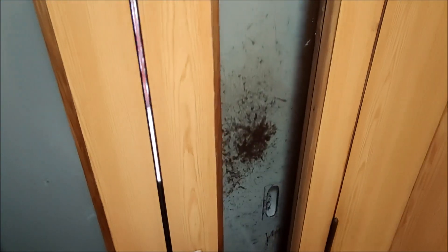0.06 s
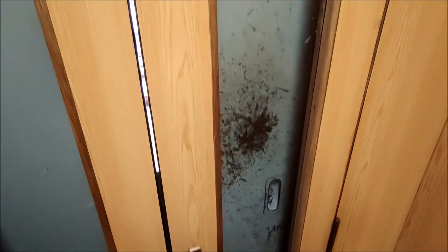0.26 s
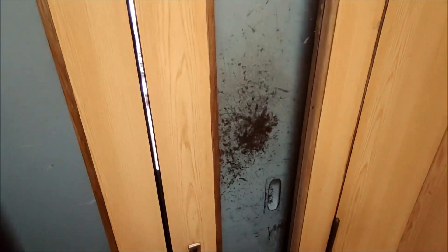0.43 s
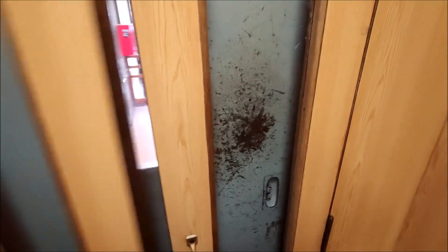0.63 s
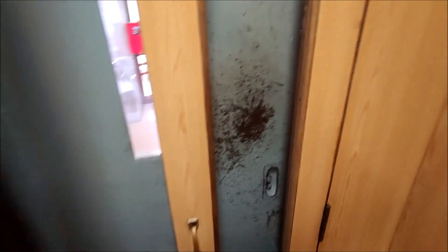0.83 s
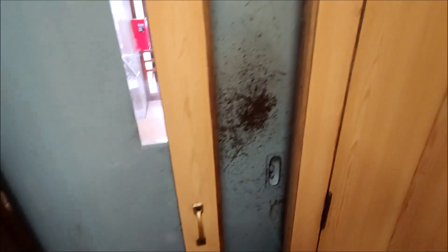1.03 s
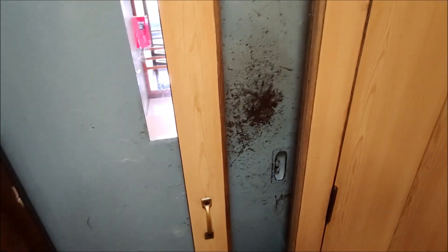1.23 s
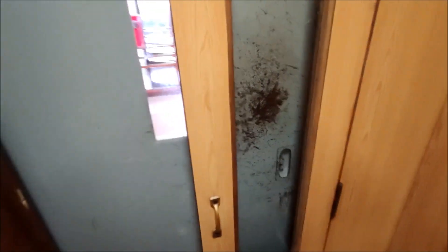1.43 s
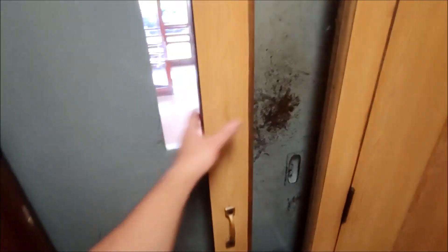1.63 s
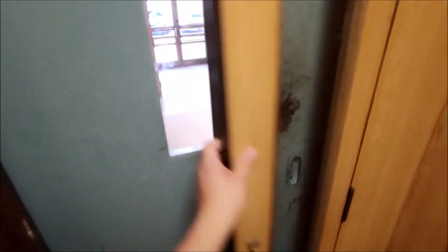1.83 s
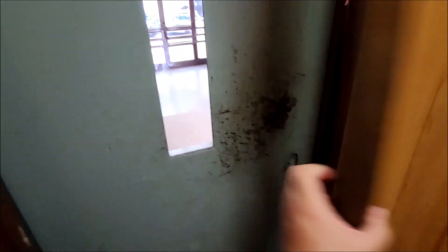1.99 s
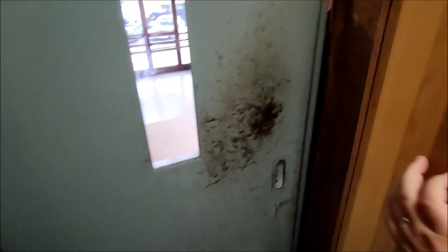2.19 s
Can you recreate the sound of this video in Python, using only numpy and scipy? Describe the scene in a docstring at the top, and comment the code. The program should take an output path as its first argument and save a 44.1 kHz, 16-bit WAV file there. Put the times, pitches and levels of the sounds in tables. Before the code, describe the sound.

Wooden folding doors are pushed open, thumping, scraping along their track and clacking against their stops with a faint squeak and metal jingle. A second door then folds back with another clack, heard close inside a small lift.

```python
"""A soft knock and a brief rub, then wooden folding doors thump free inside a small, hard-walled lift cabin.
Pushed open, the leaves scrape along their track and clack against their stops; dry pivots squeak and a
metal fitting jingles. A hand then folds back the second door. Knocks and scrapes ring the panels and the
boomy cabin over the faint air of the shaft, heard from close by through two unlike microphone ports."""
import sys
import numpy as np
from scipy import signal
from scipy.fft import rfft, irfft
from scipy.io import wavfile
from scipy.ndimage import uniform_filter1d

SR = 44100
rng = np.random.default_rng(int(sys.argv[2]) if len(sys.argv) > 2 else 0)


def inscribe(sig):
    """Save sig as 16-bit PCM at rate SR to the path in sys.argv[1].

    A 1-D sig is mono; a 2-D sig holds one channel per row.
    Samples are clipped to [-1, 1] before scaling.
    """
    pcm = np.round(np.clip(np.atleast_2d(sig).T, -1, 1) * 32767)
    wavfile.write(sys.argv[1], SR, pcm.astype(np.int16))


N = 103635

SECOND_DOOR_S, CRACK_S = 1.7, 0.04
# Tone bands of a contact: boom, body, knock, clack, snap, click (centre [Hz])
COLOUR_BANDS_HZ = [70, 270, 600, 1900, 4500, 11000]
# Door hits: (time [s], seating time [s], crack boost [dB], resonance [Hz], resonance boost [dB],
#   boom [dB], body [dB], knock [dB], clack [dB], snap [dB], click [dB])
DOOR_HITS = [ (0.001, 0.00067, 0.5, 870, 9.5, -39, -40.5, -54, -42.5, -50, -62.5),
             (0.212, 0.0076, 9, 290, -1.5, -41, -15, -28.5, -38, -44.5, -56),
             (0.253, 0.0075, 4.5, 294, 12, -32, -26.5, -30.5, -48, -69, -66),
             (0.373, 0.012, 6.5, 335, 14.5, -36, -35.5, -32.5, -25, -58, -54),
             (0.385, 0.0014, 6.5, 1920, 8.5, -32.5, -56, -42, -40, -38.5, -44),
             (0.522, 0.00041, 4.5, 1300, 19, -37, -42.5, -41, -52.5, -40, -39.5),
             (0.560, .010, 5, 69, -2.5, -30.5, -44, -44, -64, -64, -70),
             (0.598, 0.00136, -0.5, 1200, 12, -31.5, -39, -26, -29, -20, -16),
             (0.713, 0.00074, 2.5, 1026, 13.5, -34.5, -32.5, -31, -35, -26.5, -23.5),
             (0.957, 0.0059, 2.5, 660, 6.5, -45, -41, -34, -34, -34.5, -41.5),
             (1.283, 0.00042, 3, 13200, 8.5, -61, -38, -38, -32, -41, -46),
             (1.402, 0.0059, 6.5, 131.3, 1, -49.5, -51, -69, -64, -74, -82),
             (1.611, .0005, 2.5, 11960, 6, -42, -84, -67, -69, -66, -62.5),
             (1.779, 0.0071, 2.5, 478, 6, -49, -54, -59, -68, -59, -64),
             (1.835, 0.00085, 5.5, 7840, 5, -43, -47, -41, -47, -57, -52),
             (1.893, 0.00084, 1.5, 2270, 10.5, -71, -40, -33, -40, -32.5, -28.5),
             (1.973, 0.0046, 3, 650, 8.5, -36, -27, -24, -18.5, -28, -27)]
def knocks(first_door, second_door):
    """Wood and fittings hit their stops; soft blows take longer to seat, near ones crack more."""
    out, t = np.zeros((2, N)), np.arange(RING_SAMPLES) / SR
    for start, seating, crack_db, own_hz, boost_db, *colour_db in DOOR_HITS:
        place = first_door if start < SECOND_DOOR_S else second_door
        attack = 1 - np.exp(-t / seating)
        crack = from_db(crack_db * np.exp(-(t / CRACK_S) ** 2))
        add(out, start, contact_ring(place, own_hz, boost_db, colour_db) * attack * crack)
    return out


SLIPS_PER_S, SLIP_SPREAD_DB, SCRAPE_RELEASE_S = 1500, 4.5, 0.0078
# Scrape strokes: (time [s], swell [s], hold [s], resonance [Hz], resonance boost [dB],
#   boom [dB], body [dB], knock [dB], clack [dB], snap [dB], click [dB])
TRACK_STROKES = [ (0.000, 0.016, 0.01, 790, 14.6, -53, -36.5, -47, -44.5, -62, -70),
                 (0.202, 0.0029, 0.061, 1196, 9, -35.5, -33.5, -34, -29.5, -41.5, -48),
                 (0.362, 0.0083, 0.025, 1900, 2.5, -31.5, -25.5, -26, -23.5, -32, -41),
                 (0.440, 0.12, 0.109, 124.5, 4.2, -35.5, -44, -36, -45, -48, -64),
                 (0.890, 0.075, 0.019, 1500, 3.8, -60, -39, -32, -34, -45.5, -45),
                 (0.945, 0.026, 0.059, 674, 6.1, -43, -38, -34.5, -29.5, -34.5, -39),
                 (1.420, 0.031, 0.025, 2060, 4, -52, -67, -64, -55, -64.5, -61),
                 (1.451, 0.048, 0.065, 130, 2, -56.5, -73, -70, -71, -63.5, -63),
                 (1.768, 0.035, 0.12, 454, 11.2, -46.5, -44, -46.5, -41, -59, -70),
                 (2.139, 0.14, 0.041, 2570, 10.7, -76, -55.5, -55.5, -54.5, -54, -56.5)]
def scrapes(places):
    """Wood rubs on track and frame: a dense run of uneven slips rings the cabin from several places."""
    out, t = np.zeros((2, N)), np.arange(SR // 2) / SR
    for start, swell, hold, own_hz, boost_db, *colour_db in TRACK_STROKES:
        release = np.exp(-np.maximum(t - swell - hold, 0) / SCRAPE_RELEASE_S)
        stroke = np.minimum(t / swell, 1) ** 2 * release
        for place in places:
            slipping = rng.random(len(t)) < SLIPS_PER_S / len(places) / SR
            strength = from_db(SLIP_SPREAD_DB * rng.standard_normal(len(t)))
            slips = slipping * strength * rng.choice([-1, 1], len(t))
            slips /= np.sqrt(np.mean(slips ** 2) * .03 * SR * len(places))  # in all, unit energy per 30 ms
            ring = contact_ring(place, own_hz, boost_db, colour_db)
            add(out, start, signal.fftconvolve(ring, (slips * stroke)[None], axes=1))
    return out


def contact_ring(place, own_hz, boost_db, colour_db):
    """A contact rings the cabin in its own tone colour, boosted at the touched part's resonance."""
    hz, layers = place
    gains = from_db(np.interp(np.log(hz), np.log(COLOUR_BANDS_HZ), colour_db))
    return bell_eq(np.tensordot(gains, layers, 1), [(own_hz, boost_db, 2.47)])  # Q: a broad bump


RING_SAMPLES, BUILD_S = int(1.2 * SR), 0.00026
EDGES_HZ = 31 * 2 ** np.arange(0, 9.1, .5)  # half-octave bands
CENTRES_HZ = np.sqrt(EDGES_HZ[1:] * EDGES_HZ[:-1])
# Dense wash between the modes: (frequency [Hz], relative level [dB], t60 [s], stereo likeness [0-1])
CABIN_WASH = [(40, -24.5, 1, 1), (130, -3.5, 0.61, 0.67), (273, -5, 0.41, 0.9), (510, -4, 0.6, 0.7),
              (1011, -2.5, 0.37, 0), (1890, -2, 0.35, 0), (3330, 0, 0.3, 0), (6290, -6.5, 0.27, 0),
              (8900, 1, 0.26, 0), (15600, -6.5, 0.2, 0.21)]
# Ringing notes of cabin and door panels: (pitch [Hz], relative level [dB], t60 [s])
CABIN_MODES = [(48.5, -10.5, 1.42), (83.9, -3, 0.65), (124.7, -7.5, 1), (169.2, -5.5, 0.63),
               (194.8, -5, 0.34), (256.2, -5.5, 0.6), (284.7, -13, 0.77), (329.4, -8.5, 0.63),
               (345, -14.5, 0.99), (398, -13.5, 0.66), (483.4, -6, 0.52), (544, -4.5, 0.26),
               (592, -12.5, 0.37), (655.5, -12.5, 0.2), (722.5, -10, 0.32), (906, -14.5, 0.35),
               (1217, -16, .38), (1586, -18.5, 0.58), (2198, -14, 0.35), (2460, -31, 0.13),
               (8330, -24.5, 0.43), (8660, -25, 0.15)]
def cabin():
    """Cabin and panels ring from one place: the frequencies and stereo layers of wash and modes."""
    t, layers = np.arange(RING_SAMPLES) / SR, []
    build = 1 - np.exp(-t / BUILD_S)
    for low, high, hz in zip(EDGES_HZ, EDGES_HZ[1:], CENTRES_HZ):
        envelope = build * from_db(-60 * t / at_hz(CABIN_WASH, hz, column=2))
        wash = bunch_modes(band_noise(low, high, RING_SAMPLES)) * envelope
        trim = np.sqrt(.5 * np.mean(envelope ** 2) / np.mean(wash ** 2))
        layers.append(wash * trim * from_db(at_hz(CABIN_WASH, hz)))
    for hz, db, t60 in CABIN_MODES:
        right_shift = np.array([[0], [1]]) * np.arccos(at_hz(CABIN_WASH, hz, column=3))
        phase = rng.uniform(0, 2 * np.pi) + right_shift * rng.choice([-1, 1])
        envelope = build * from_db(db - 60 * t / t60)
        layers.append(np.sqrt(2) * envelope * np.sin(2 * np.pi * hz * t + phase))
    return np.r_[CENTRES_HZ, [mode[0] for mode in CABIN_MODES]], np.array(layers)


def bunch_modes(wash, width_hz=173.4, depth_db=1.5):
    """The panels' many modes bunch together into uneven peaks and valleys."""
    spectrum, size = rfft(wash), wash.shape[-1]
    ripple = uniform_filter1d(rng.standard_normal(spectrum.shape), size=int(width_hz * size / SR))
    return irfft(spectrum * from_db(depth_db * ripple / ripple.std()), size)


# Pivot squeaks: (time [s], swell [s], time to fade by 20 dB [s], pitch [Hz], level [dB])
PIVOT_SQUEAKS = [(0.40, 0.12, 0.19, 1594, -38.5), (0.58, 0.1, 0.038, 483, -28.5)]
def squeaks(waver_depth=0.0068):
    """Dry pivots sing short tones that waver slightly in pitch."""
    out, t = np.zeros((2, N)), np.arange(SR // 2) / SR
    for start, swell, fade, hz, db in PIVOT_SQUEAKS:
        waver = uniform_filter1d(rng.standard_normal(len(t)), size=400)
        phase = 2 * np.pi * np.cumsum(hz * (1 + waver_depth * waver / waver.std())) / SR
        envelope = np.minimum(t / swell, 1) * from_db(db - 20 * np.maximum(t - swell, 0) / fade)
        add(out, start, np.sqrt(2) * envelope * np.sin(phase))
    return out


# Thin, bright partials of the fitting: (pitch [Hz], level [dB], t60 [s])
FITTING_MODES = [(6230, -36.5, 0.17), (7780, -42, 0.19), (9570, -38.5, 0.26), (11080, -32, .17),
                 (11600, -43, 0.25)]
def jingle(start=0.386, right_db=-15):
    """A small metal fitting rings off to the left as the leaves fold."""
    out, t = np.zeros((2, N)), np.arange(SR // 2) / SR
    ring = sum(from_db(db - 60 * t / t60) * np.sin(2 * np.pi * hz * t) for hz, db, t60 in FITTING_MODES)
    add(out, start, np.array([ring, from_db(right_db) * ring]))
    return out


# Room tone: (frequency [Hz], level in one octave [dB])
SHAFT_TONE = [(40, -80), (120, -53), (250, -68), (600, -71), (2000, -70), (5000, -75), (10000, -74.5),
              (16000, -65)]
def shaft_air():
    """The still air of the shaft lays a quiet, steady bed of rumble and hiss."""
    return sum(np.sqrt(.5) * from_db(at_hz(SHAFT_TONE, hz)) * band_noise(low, high, N)
               for low, high, hz in zip(EDGES_HZ, EDGES_HZ[1:], CENTRES_HZ))


def band_noise(low, high, size):
    """One band of noise at rms 1, with the cabin's stereo width."""
    sos = signal.butter(3, [low, high], "band", fs=SR, output="sos")
    mid, side = signal.sosfilt(sos, rng.standard_normal((2, size + SR // 4)))[:, -size:]
    likeness = at_hz(CABIN_WASH, np.sqrt(low * high), column=3)
    noise = np.sqrt(1 + likeness) * mid + np.sqrt(1 - likeness) * side * np.array([[1], [-1]])
    return noise / noise.std()


def bell_eq(x, bells):
    """A chain of resonant peaks and dips."""
    for hz, db, q in bells:
        angle, gain = 2 * np.pi * hz / SR, from_db(db / 2)
        width, tuning = np.sin(angle) / (2 * q), -2 * np.cos(angle)
        zeros = [1 + width * gain, tuning, 1 - width * gain]
        poles = [1 + width / gain, tuning, 1 - width / gain]
        x = signal.lfilter(zeros, poles, x)
    return x


def from_db(db):
    """Decibels to gain."""
    return 10 ** (np.asarray(db) / 20)


def at_hz(rows, hz, column=1):
    """Reads one column of a table along log frequency."""
    rows = np.array(rows)
    return np.interp(np.log(hz), np.log(rows[:, 0]), rows[:, column])


def add(out, start, sound):
    """Mixes a sound in at a time in seconds."""
    i = int(start * SR)
    out[:, i:i + sound.shape[-1]] += sound[..., :N - i]


def scene():
    """The doors in their cabin; stops and track set it ringing from different places."""
    doors = knocks(cabin(), cabin()) + scrapes([cabin(), cabin(), cabin()])
    return doors + jingle() + squeaks() + shaft_air()


# Peaks and dips of each microphone port: (frequency [Hz], gain [dB], sharpness [Q])
LEFT_PORT_EQ = [(2200, -1.5, 0.82), (8214, 15, 2.7), (12100, 5, 7.2), (12500, 3, 13)]
RIGHT_PORT_EQ = [(2000, 4, 2.9), (5700, 8, 0.97), (8340, -27.5, 2.9), (13000, -7, 5.9)]
CUTOFF_HZ = 15700
def record(dry):
    """Each port colours its channel, soft clipping rounds the peaks and a steep filter cuts the top."""
    coloured = np.array([bell_eq(dry[0], LEFT_PORT_EQ), bell_eq(dry[1], RIGHT_PORT_EQ)])
    rounded = 2 * np.tanh(coloured / 2)
    return signal.sosfilt(signal.ellip(10, .2, 80, CUTOFF_HZ, fs=SR, output="sos"), rounded)


dry = scene()
out = record(dry)
inscribe(out)
```